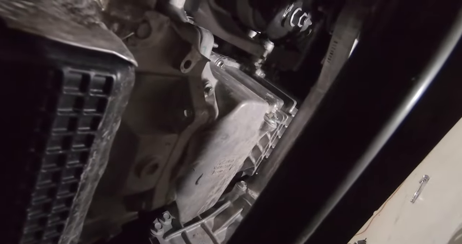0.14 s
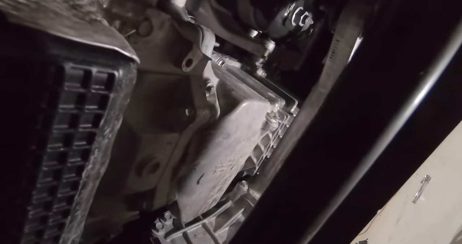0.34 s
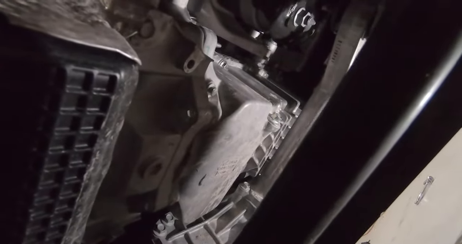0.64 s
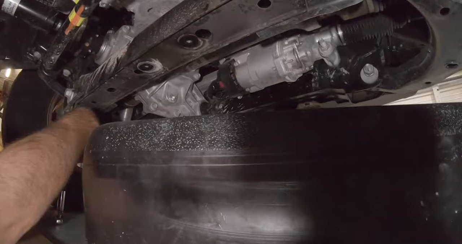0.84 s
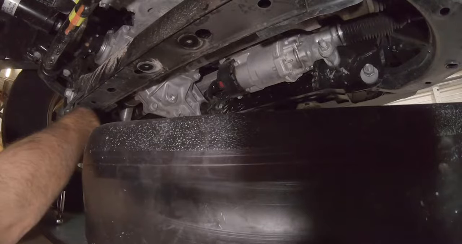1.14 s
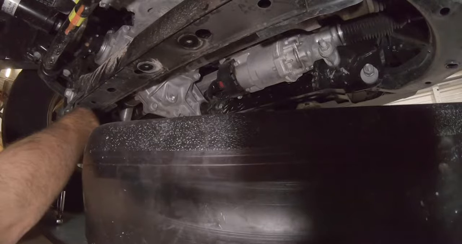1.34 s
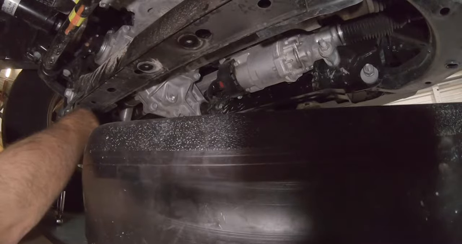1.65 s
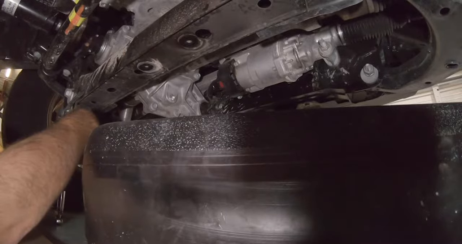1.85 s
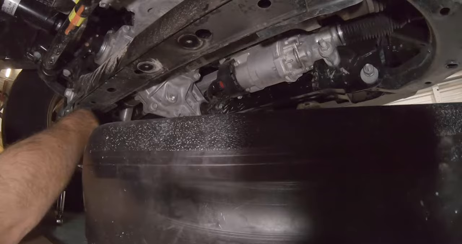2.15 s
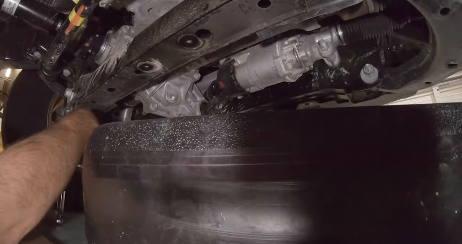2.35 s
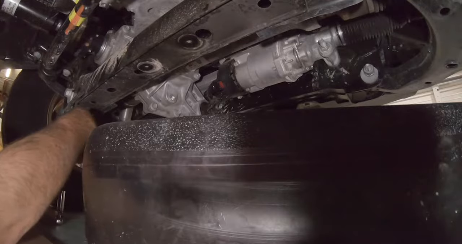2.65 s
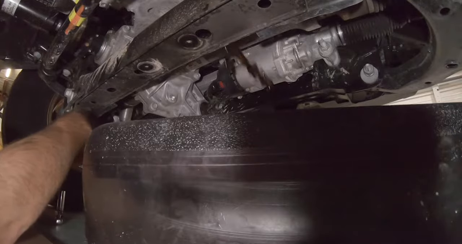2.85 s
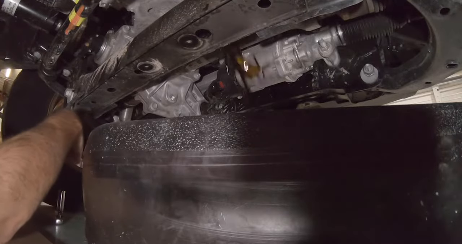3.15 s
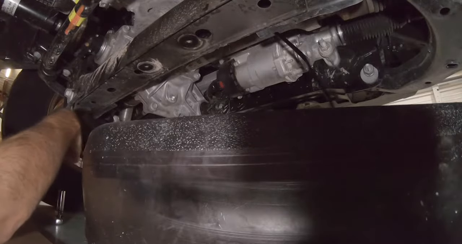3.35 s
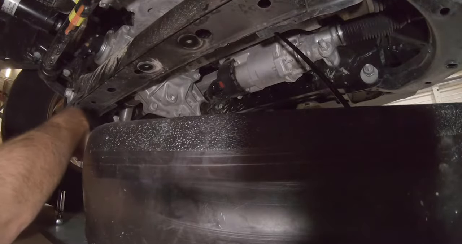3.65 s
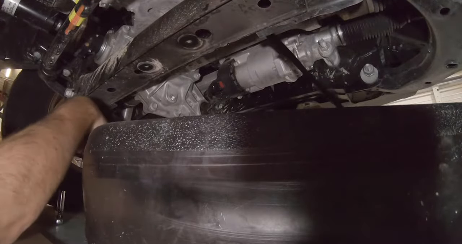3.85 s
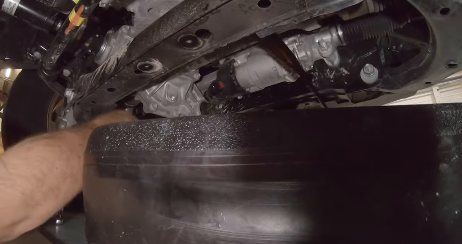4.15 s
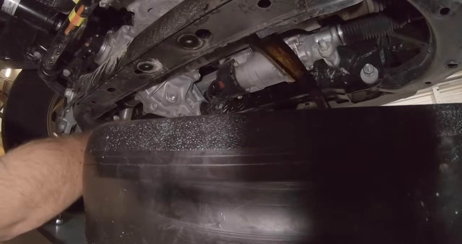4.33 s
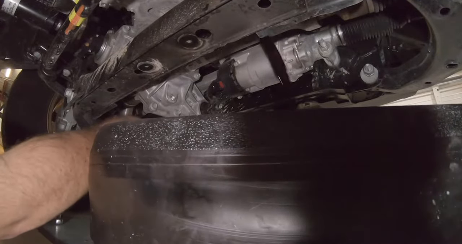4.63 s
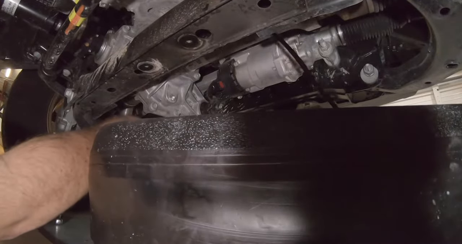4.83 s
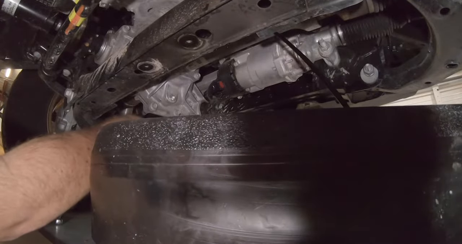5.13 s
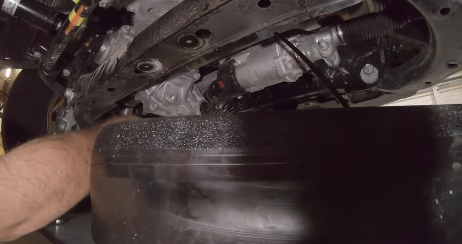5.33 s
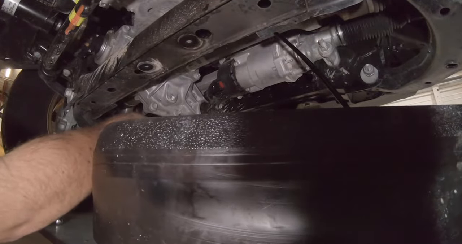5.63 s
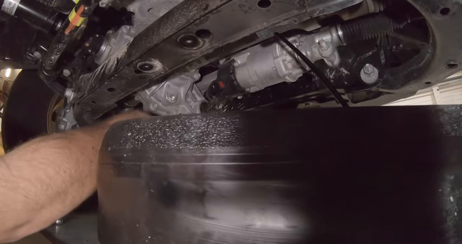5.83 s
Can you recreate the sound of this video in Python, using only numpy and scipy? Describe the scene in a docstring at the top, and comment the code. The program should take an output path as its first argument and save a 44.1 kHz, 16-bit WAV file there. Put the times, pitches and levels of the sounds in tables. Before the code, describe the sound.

Cloth rustles and bumps close by, then thick oil drips, gushes and drums into a plastic pan before the pan scrapes over gritty concrete.

```python
"""Oil change under a car

In a garage, sleeves rustle close by, then warm oil falls into a plastic pan.
A few drops lead, a gush slaps and drums on the pan's floor and settles into a soft stream.
Noise bands and puffs of noise make the oil, cloth and friction; ringing tones make the pan and the bubbles.
The pan is nudged, knocked and dragged over the concrete, with the quiet air of the garage behind it."""
import sys
import numpy as np
from scipy import signal
from scipy.fft import rfft, irfft, next_fast_len
from scipy.io import wavfile
from scipy.ndimage import uniform_filter1d

SR = 44100
rng = np.random.default_rng(int(sys.argv[2]) if len(sys.argv) > 2 else 0)


def generate_wav(sig):
    """Save sig (samples, or channels by samples) to the path in sys.argv[1] as 16-bit PCM at SR."""
    pcm = np.round(np.clip(np.atleast_2d(sig).T, -1, 1) * 32767).astype(np.int16)
    wavfile.write(sys.argv[1], SR, pcm)


N = 264004
TIME = np.arange(N) / SR

# Levels in the tables are relative: the sources and the final mix scale them further.
# surges of the gush: (start [s], hold [s], drumming level [dB], spray level [dB])
SURGES = [(2.975, 0.044, -14.5, -43.5), (3.087, 0.081, -16, -39), (3.223, 0.028, -17.5, -41),
          (3.332, 0.082, -20.5, -39.5), (3.468, 0.059, -17.5, -39.5), (4.806, 0.042, -24, -44)]
# heavy gobs of oil hit the pan's floor: (time [s], level [dB])
GOBS = [(2.967, -24), (2.979, -19), (3.084, -22.5), (3.116, -21), (3.336, -30), (3.521, -18),
        (3.552, -28.5), (4.286, -37), (4.573, -19.5)]
# notes of the pan's floor and walls: (pitch [Hz], level [dB], time to fall 60 dB [s])
PAN_MODES = [(73.3, -8, 0.82), (85.5, -3.5, 0.25), (107.3, -16, 0.37), (132.4, -8.5, 0.66),
             (164.6, -7.5, 0.47), (195.4, -0.5, 0.15), (254.6, -10.5, 0.43), (275.8, -16, 0.36),
             (358.3, -19, 0.13), (643, -7.5, 0.054)]
# flow of the settled stream: (time [s], level [dB])
FLOW = [(3.7, -39), (4.048, -41.5), (4.08, -34), (4.55, -24.5), (4.785, -22.5), (4.87, -33), (5.054, -45),
        (5.144, -27.5), (5.218, -39), (5.244, -23.5), (5.58, -52)]
# drops splat: (time [s], level [dB], centre pitch [Hz])
SPLATS = [(1.915, -49.5, 2380), (2.684, -40.5, 4170), (2.7225, -32, 4700), (2.826, -43.5, 4070),
          (2.964, -35, 1790), (2.977, -22.5, 6400), (2.979, -22, 840), (3.039, -27, 6300),
          (3.081, -38.5, 950), (3.102, -28, 750), (3.106, -23, 5540), (3.173, -34.5, 6500),
          (3.244, -40.5, 5000), (3.316, -32.5, 4530), (3.402, -17.5, 6900), (3.47, -31, 5440),
          (3.592, -41, 5500), (3.628, -51, 7500), (4.444, -42, 806), (4.523, -42, 5860), (4.699, -34, 5900)]
# drops that trap a bubble and ring: (time [s], level [dB], base pitch [Hz])
PLINKS = [(2.683, -41.5, 3000), (2.724, -32.5, 2983), (2.83, -39, 3110), (3.399, -17, 2780),
          (3.469, -28.5, 3200), (4.143, -35.5, 3200), (4.396, -39.5, 3400), (4.773, -33.5, 3400),
          (4.891, -38.5, 2700)]
# oil squirts through the drain hole: (start [s], hold [s], level [dB], centre pitch [Hz], width [octaves])
SQUIRTS = [(4.807, 0.0069, -29, 5370, 0.6), (4.838, 0.022, -30.5, 5250, 0.27),
           (4.845, 0.0071, -26, 4320, 0.88)]
# short, smooth pushes of the pan: (start [s], hold [s], level [dB])
NUDGES = [(4.555, 0.12, -30), (5.14, 0.1, -45.5), (5.945, 0.045, -30)]
# the pan is dragged hard over grit: (start [s], hold [s], level [dB], extra drive of the rim [dB])
DRAGS = [(5.636, 0.1, -31.5, -2), (5.725, 0.031, -22, 4.5), (5.764, 0.12, -35.5, -2.5),
         (5.951, .06, -22.5, -19)]
# the pan is bumped: (time [s], crack level [dB], boom level [dB])
KNOCKS = [(5.239, -19.5, -18.5)]
# the dragged pan catches on the ground and slips: (time [s], crack level [dB], boom level [dB])
SLIPS = [(5.634, -28, -41), (5.666, -21.5, -39), (5.676, -20.5, -36), (5.723, -20.5, -34),
         (5.742, -23.5, -22), (5.756, -26.5, -17), (5.811, -18.5, -30), (5.831, -15.5, -17.5),
         (5.866, -22, -18.5)]
# resonances of the stiff rim: (pitch [Hz], boost [dB])
RIM = [(836, 9), (1372, 10), (1850, 9), (2360, 4), (2710, 5), (2890, 10), (3210, 13), (3810, 6), (4308, 12),
       (5345, 6)]
# sleeves rub close by: (start [s], hold [s], level [dB])
RUBS = [(0.383, 0.023, -50), (0.495, 0.041, -46.5), (0.603, 0.028, -43), (0.668, 0.042, -57)]
# cloth scuffs the microphone's housing: (start [s], hold [s], scuff level [dB], rumble level [dB])
SCUFFS = [(0, 0.021, -38, -43), (0.079, 0.035, -38.5, -29), (0.177, 0.04, -42, -42),
          (0.231, 0.074, -40, -32), (0.378, 0.041, -43.5, -40.5), (0.467, 0.085, -45.5, -40.5),
          (0.61, 0.051, -48, -40.5)]
# soft bumps of the hand: (time [s], level [dB], pulse length [s])
BUMPS = [(0.073, -11.5, 0.005), (0.116, -28, 0.0086), (0.298, -29.5, 0.013)]
# notes of the tapped housing: (pitch [Hz], level [dB], time to fall 60 dB [s])
HOUSING_MODES = [(265.6, 5, 0.085), (534, -7, 0.072), (1144, -5, 0.024)]
# dull thuds of the arm: (start [s], hold [s], level [dB], centre pitch [Hz])
THUDS = [(1.064, 0.032, -45, 203), (1.96, 0.034, -44, 201)]
# faint hisses swell and fade: (start [s], hold [s], level [dB], centre pitch [Hz], width [octaves])
HISSES = [(1.26, 0.15, -63.5, 2220, 1.17), (2.686, 0.17, -63, 2590, 1.5), (4.849, 0.017, -49, 4960, 0.28),
          (5.33, 0.29, -68, 2170, 0.19)]
# the arm stirs against the pan: (start [s], hold [s], level [dB])
STIRRING = [(.76, 0.49, -44.5), (1.06, 0.32, -40), (2.65, 0.56, -40.5)]

# tone colours of the sources, before each is levelled: (frequency [Hz], level per Hz [dB])
GUSH_DRUM_COLOUR = [(35, -55), (65, -7), (87, -2), (112, -7.5), (185, -12.5), (220, -24), (280, -15.5),
                    (330, -32.5), (500, -38), (1000, -90.5)]
SPRAY_COLOUR = [(250, -16.5), (700, -1.5), (1200, -9.5), (2200, -12.5), (4200, -18), (6000, -11),
                (7800, -20.5), (10500, -40.5)]
STREAM_DRUM_COLOUR = [(25, -37), (50, -4), (78, -1.5), (125, 5), (150, 0), (190, 3), (280, -15.5),
                      (400, -20.5), (1000, -73)]
PATTER_COLOUR = [(250, -9.5), (700, 7), (1100, -6), (1500, -3.5), (3000, -13), (5500, -14), (8500, -64)]
SPLAT_COLOUR = [(200, -23.5), (600, 8.0), (6500, 9.5), (8200, 0.0), (10500, -22.0)]
FLAT_COLOUR = [(2000, 0)]
SLIDE_COLOUR = [(150, -10.5), (400, -2.5), (850, 9), (1150, 0.5), (1750, 0), (2200, -11.5), (5400, -11),
                (6600, -25.5), (14000, -60.5)]
GRIT_COLOUR = [(180, -20.5), (320, 4), (500, -7.5), (750, 2.5), (1100, -9), (1700, -5.5), (2300, -13.5),
               (4800, -13.5), (7000, -18.5), (9000, -51), (14000, -70.5)]
HAND_RUMBLE_COLOUR = [(12, -7.5), (50, 8.5), (130, -9), (240, -4.5), (550, -15.5), (1200, -57.5)]
CLOTH_COLOUR = [(250, 3.5), (1100, 1.5), (2300, -3.5), (4200, -4), (6000, -12.5), (8500, -38), (10400, -50)]
HOUSING_COLOUR = [(200, -10.5), (550, 5), (1500, -2.5), (2300, -10.5), (3200, -13.5), (4000, -10),
                  (5000, -16.5), (6100, -9), (7000, -21.5), (8600, -23), (10400, -50)]
GARAGE_COLOUR = [(20, -19), (55, -0.5), (110, -8), (180, -5), (300, -19.5), (520, -26.5), (780, -21.5),
                 (870, -16), (980, -29), (2000, -35), (4400, -41), (6000, -39), (8600, -51.5), (11500, -63)]

# how alike left and right are: (frequency [Hz], correlation [-1 to 1])
OIL_LIKENESS = [(110, 0.96), (270, 0.94), (480, -0.36), (900, -0.14), (1600, 0.65), (3600, 0.62),
                (6000, -0.27)]
PAN_LIKENESS = [(250, 1), (750, 0.21), (2400, 0.84), (6000, 0.085)]
HAND_LIKENESS = [(100, -0.063), (500, -0.89), (2000, -0.91), (3800, 0.87), (6000, 0.053)]
CLOTH_LIKENESS = [(1000, 1)]
AIR_LIKENESS = [(200, 0.34), (800, -0.85), (4000, -0.19)]
# the stereo image narrows for a while: (time [s], level of the left-right difference [dB])
WIDTH = [(3.7, -1.5), (4.5, -42), (5.0, -25), (5.65, -3)]

# A T60 is the time a sound takes to fall by 60 dB.
GOB_HARDNESS_HZ = 300
FLOOR_HZ, FLOOR_WAVER = 87.46, 0.04855  # average lowest note of the floor; typical share by which oil bends it
SPRAY_RELEASE_S = 0.14  # time to fall 20 dB: spray falls back more slowly than its surge
PATTER_DB, PATTER_FOLLOWS = -26, 0.86  # patter at a flow of 0 dB; share of the flow's swing in dB
SPLAT_OCTAVES, SPLAT_T60_S = 0.86, 0.037
SPIT_DB = -27.5  # the broadband part of every splat
FIZZ_DB, FIZZ_T60_S = -20.5, 0.16  # the faint tail of every splat
PLINK_RISE_S, PLINK_T60_S = 0.002, 0.028
PLINK_CLIMB_PER_S, PLINK_WAVER = 2, .08  # share of the pitch gained each second; typical share of wobble
SQUIRT_CRACKLE_DB = -25  # the broadband part of every squirt
BOOM_DB, BOOM_LAG_S, BOOM_RELEASE_S = 2, 0.014, 0.27  # the walls take up friction late, let it go slowly
BOUNCE_S, BOUNCE_DB = 0.01004, -9.5  # delay of the second blow; level of a bump's second crack
TOCK_DB, TOCK_HZ, TOCK_T60_S = 1.5, 835, 0.06  # hollow note of a bump, relative to its crack
RIM_WIDTH_HZ, RIM_WIDTH_SHARE = 32, .004  # resonance width: a fixed part plus a share of its pitch
RUSTLE_ENDS_S = 0.716
SLEEVE_LAG_S, SLEEVE_ECHO = .0008, .65  # average delay and strength of the sleeve's reflection
SLEEVE_SWING, SLEEVE_SWING_HZ = .2, 5  # typical share by which the delay swings; upper limit of its speed
TAP_S, TAP_DB = 3.521, -12.5
GARAGE_DB = -49
CUTOFF_HZ = 15700  # from here up, sound is at least 70 dB down


def from_db(db):
    """Turn decibels into a factor for loudness."""
    return 10 ** (np.asarray(db) / 20)


def rms_one(x):
    """Scale x to an average strength (rms) of 1."""
    return x / np.sqrt(np.mean(x ** 2) + 1e-20)


def gain_curve(rows, fade):
    """Turn (time, dB) rows into a gain that fades to silence outside their span."""
    seconds, db = np.transpose(rows)
    distance_inside = np.minimum(TIME - seconds[0], seconds[-1] - TIME)
    inside = np.clip(1 + distance_inside / fade, 0, 1)
    return inside * from_db(np.interp(TIME, seconds, db))


def at_hz(points, hz):
    """Read a table between its points on a log-frequency axis."""
    known, values = np.transpose(points)
    return np.interp(np.log(hz + 1), np.log(known), values)


def filtered(x, hz, kind, order=2):
    """Keep the low, high or middle band of x."""
    sections = signal.butter(order, np.clip(hz, 10, .45 * SR), kind, fs=SR, output="sos")
    return signal.sosfilt(sections, x)


def around(x, hz, octaves, order=1):
    """Keep a band of x about a centre pitch; rms 1."""
    edges = hz * 2 ** (np.array([-.5, .5]) * octaves)
    return rms_one(filtered(x, edges, "band", order=order))


def noise():
    """Two unrelated channels of white noise."""
    return rng.standard_normal((2, N))


def colour(white, spectrum, likeness):
    """Give two unrelated white signals this spectrum and stereo likeness, with no sound ahead of time; rms 1."""
    size = 2 * next_fast_len(N // 2 + 4096)
    hz = np.arange(size // 2 + 1) * SR / size
    # folding the cepstrum forward gives a filter that only looks back in time
    cepstrum = irfft(np.log(from_db(at_hz(spectrum, hz))))
    response = np.exp(rfft(2 * cepstrum[:size // 2], size) - cepstrum[0])
    alike = np.clip(at_hz(likeness, hz), -.999, .999)
    mid, side = rfft(white, size) * response * np.sqrt([1 + alike, 1 - alike])
    return rms_one(irfft([mid + side, mid - side])[:, :N])


def grains(per_s, spread_db, smear):
    """Tiny contacts of uneven size, each a puff of noise that dies at a rate set by smear [s]."""
    happens = rng.random(N) < per_s / SR
    sizes = happens * from_db(spread_db * np.minimum(rng.exponential(1, N), 3))
    power = signal.lfilter([1], [1, -np.exp(-1 / (smear * SR))], sizes ** 2 + 1e-12)
    return rms_one(np.sqrt(power) * noise())


def steady(x, seconds):
    """Even out swells slower than this many seconds."""
    power = uniform_filter1d(np.mean(x ** 2, axis=0), int(seconds * SR) + 1)
    return x / np.sqrt(np.abs(power) + 1e-9)


def strokes(rows, attack, release):
    """Rise, hold and fall for each (start, hold, dB); attack and release are the seconds taken for 20 dB."""
    power = 0
    for start, hold, db in rows:
        away = np.maximum(start - TIME, 0) / attack + np.maximum(TIME - start - hold, 0) / release
        power = power + from_db(db - 20 * np.minimum(away, 10)) ** 2
    return np.sqrt(power)


def burst(start, rise, t60):
    """An envelope that rises quickly and dies away."""
    out, first = np.zeros(N), int(start * SR)
    age = TIME[:min(N - first, SR)]
    decay = from_db(-60 * np.maximum(age - rise, 0) / t60)
    out[first:first + len(age)] = np.minimum(age / rise, 1) * decay
    return out


def click(start, db):
    """A single-sample blow."""
    return from_db(db) * (np.arange(N) == round(start * SR)) + 1e-18


def ring(force, hz, t60):
    """One note of a struck object: a unit click starts a dying sine wave."""
    r, w = from_db(-60 / (t60 * SR)), 2 * np.pi * hz / SR
    return signal.lfilter([0, np.sin(w)], [1, -2 * r * np.cos(w), r * r], force)


def pan_body(force):
    """Any force sets the pan's floor and walls ringing at their own notes."""
    return sum(from_db(db) * ring(force, hz, t60) for hz, db, t60 in PAN_MODES)


def pan_rim(x):
    """The stiff rim boosts narrow bands side by side."""
    out = 0
    for hz, db in RIM:
        r = np.exp(-np.pi * (RIM_WIDTH_HZ + RIM_WIDTH_SHARE * hz) / SR)
        poles = [1, -2 * r * np.cos(2 * np.pi * hz / SR), r * r]
        zeros = np.array([1, 0, -1]) * (1 - r * r) / 2
        out = out + from_db(db) * signal.lfilter(zeros, poles, x)
    return out


def gush():
    """Gobs and surges of oil drum on the pan and throw a fine spray; returns gobs with drumming, and spray."""
    drum = strokes([(s, hold, db) for s, hold, db, _ in SURGES], attack=0.019, release=0.12)
    spray = strokes([(s, hold, db) for s, hold, _, db in SURGES], attack=0.033, release=SPRAY_RELEASE_S)
    blows = sum(click(s, db) for s, db in GOBS)
    gobs = pan_body(filtered(blows, GOB_HARDNESS_HZ, "low", order=1))
    churn = from_db(-5.5) * steady(colour(noise(), GUSH_DRUM_COLOUR, OIL_LIKENESS), seconds=0.03)
    # the soft weight of the oil keeps the floor's lowest note ringing
    bend = rms_one(filtered(noise()[0], 13.47, "low"))
    pitch = FLOOR_HZ * (1 + FLOOR_WAVER * bend)
    ringing = rms_one(np.sin(2 * np.pi * np.cumsum(pitch) / SR))
    droplets = colour(grains(per_s=300, spread_db=4.3, smear=0.003), SPRAY_COLOUR, OIL_LIKENESS)
    return filtered(gobs, 140, "high") + drum * (churn + ringing), spray * droplets


def stream():
    """The thick stream drums, and a light patter on the pooling oil follows its flow; returns both."""
    flow = gain_curve(FLOW, fade=0.052)
    beats = colour(grains(per_s=220, spread_db=3.0, smear=0.009), STREAM_DRUM_COLOUR, PAN_LIKENESS)
    drumming = from_db(-3.0) * flow * steady(beats, seconds=0.22)
    drops = colour(grains(per_s=380, spread_db=3.5, smear=0.0037), PATTER_COLOUR, OIL_LIKENESS)
    return drumming, from_db(PATTER_DB) * flow ** PATTER_FOLLOWS * drops


def splats():
    """Each drop is a short spit of noise around a pitch, with a fizzing tail."""
    source, out = colour(noise(), SPLAT_COLOUR, OIL_LIKENESS), np.zeros((2, N))
    for s, db, hz in SPLATS:
        near = slice(int(s * SR), int(s * SR) + SR // 2)
        spit = source[:, near]
        band = around(spit, hz, SPLAT_OCTAVES)
        hit = (band + from_db(SPIT_DB) * spit) * burst(s, rise=0.0015, t60=SPLAT_T60_S)[near]
        fizz = from_db(FIZZ_DB) * band * burst(s, rise=0.016, t60=FIZZ_T60_S)[near]
        out[:, near] += from_db(db) * (hit + fizz)
    return out


def plinks():
    """A trapped bubble rings briefly in thick oil; its pitch wobbles and climbs as it nears the surface."""
    out, wobble = 0, PLINK_WAVER * rms_one(filtered(noise()[0], 900, "low"))
    for s, db, hz in PLINKS:
        climb = PLINK_CLIMB_PER_S * np.clip(TIME - s, 0, PLINK_T60_S)
        tone = np.sin(2 * np.pi * np.cumsum(hz * (1 + wobble + climb)) / SR)
        out = out + from_db(db) * burst(s, rise=PLINK_RISE_S, t60=PLINK_T60_S) * tone
    return out


def squirts():
    """Short jets of tiny droplets, each hissing in a sharply bounded band over a faint broad crackle."""
    jet = colour(grains(per_s=700, spread_db=4, smear=.001), FLAT_COLOUR, OIL_LIKENESS)
    out = 0
    for s, hold, db, hz, octaves in SQUIRTS:
        hiss = around(jet, hz, octaves, order=4) + from_db(SQUIRT_CRACKLE_DB) * jet
        out = out + strokes([(s, hold, db)], attack=0.003, release=0.014) * hiss
    return out


def drag():
    """Plastic is bumped, sticks and slips on grit: rim rings, walls boom; returns boom and rasp."""
    friction = strokes([(s, hold, db) for s, hold, db, _ in DRAGS], attack=0.036, release=0.02)
    on_rim = strokes([(s, hold, db + rim_db) for s, hold, db, rim_db in DRAGS], attack=0.012, release=0.01)
    late = [(s + BOOM_LAG_S, hold, db + BOOM_DB) for s, hold, db, _ in DRAGS]
    boom = strokes(late, attack=0.05, release=BOOM_RELEASE_S)

    cracks = sum(from_db(db) * burst(s, rise=0.00038, t60=0.03) for s, db, _ in KNOCKS + SLIPS)
    for s, db, _ in KNOCKS:  # a second, weaker crack as the pan settles
        cracks += from_db(db + BOUNCE_DB) * burst(s + BOUNCE_S, rise=0.00073, t60=0.03)
    grit = grains(per_s=1400, spread_db=-1.5, smear=0.0018)
    snaps = cracks * noise()
    contact = friction * grit + snaps
    strength = np.sqrt(np.mean(contact ** 2))
    scrape = contact + pan_rim(on_rim * grit + snaps)
    rasp = from_db(-2.0) * strength * colour(scrape, GRIT_COLOUR, PAN_LIKENESS)
    # a slip rings the hollow note half as strongly as a knock
    tocks = sum(click(s, db) for s, db, _ in KNOCKS) + .5 * sum(click(s, db) for s, db, _ in SLIPS)
    rasp += from_db(TOCK_DB) * ring(tocks, TOCK_HZ, TOCK_T60_S)

    shoves = sum(click(s, db) + click(s + BOUNCE_S, db) for s, _, db in KNOCKS + SLIPS)
    blows = pan_body(filtered(shoves, [150, 700], "band", order=1))
    shaking = filtered(filtered(noise()[0], 460, "low"), 210, "high", order=1)
    judder = steady(pan_body(shaking)[None], seconds=0.067)
    return blows + boom * judder, rasp * from_db([[-1.8], [1.4]])  # the rasp leans right


def nudges():
    """Short, smooth pushes of the pan over concrete: many tiny contacts blur into a slide."""
    push = strokes(NUDGES, attack=0.039, release=0.05)
    slide = colour(grains(per_s=1500, spread_db=3, smear=0.012), SLIDE_COLOUR, PAN_LIKENESS)
    return from_db(1.5) * push * slide


def sweeping(x):
    """A close reflection off the moving sleeve: its changing delay sweeps peaks through the rustle."""
    swing = rms_one(filtered(noise()[0], SLEEVE_SWING_HZ, "low"))
    lag = SLEEVE_LAG_S * (1 + SLEEVE_SWING * swing)
    echo = np.array([np.interp(TIME - lag, TIME, side) for side in x])
    return rms_one(x + SLEEVE_ECHO * echo)


def handling():
    """Cloth brushes close by, scuffs the housing and snags once while the hand rumbles and bumps."""
    rustle = strokes(RUBS, attack=0.075, release=0.059)
    scuff = strokes([(s, hold, db) for s, hold, db, _ in SCUFFS], attack=0.063, release=0.039)
    grip = strokes([(s, hold, db) for s, hold, _, db in SCUFFS], attack=0.043, release=0.05)
    brushing = colour(grains(per_s=1700, spread_db=5, smear=0.014), CLOTH_COLOUR, CLOTH_LIKENESS)
    scraping = colour(grains(per_s=1200, spread_db=3.5, smear=0.0029), HOUSING_COLOUR, HAND_LIKENESS)
    out = grip * colour(noise(), HAND_RUMBLE_COLOUR, HAND_LIKENESS)
    out += rustle * sweeping(brushing)
    out += scuff * scraping
    snag = from_db(-42.5) * around(noise()[0], hz=1750, octaves=0.59, order=2)
    snag = snag + from_db(-37.0) * around(noise(), hz=6400, octaves=0.4, order=2)
    out += snag * burst(0.057, rise=0.0059, t60=0.2)
    for k, (s, db, length) in enumerate(BUMPS):  # shoves alternate and reach the two sides in opposite phase
        push = np.sin(np.pi * np.clip((TIME - s) / length, 0, 1)) ** 2
        out += (-1) ** k * from_db(db) * push * np.array([[.6], [-1.6]])
    return out * np.clip((RUSTLE_ENDS_S - TIME) / 0.0054, 0, 1)


def tap():
    """One tap on the microphone's housing rocks it sideways, so the two sides ring in opposite phase."""
    blow = click(TAP_S, TAP_DB)
    rocking = sum(from_db(db) * ring(blow, hz, t60) for hz, db, t60 in HOUSING_MODES)
    return rocking * np.array([[.85], [-1.1]])


def thuds():
    """The soft weight of the arm lands as a low band of noise, without any crack."""
    out = 0
    for s, hold, db, hz in THUDS:
        dull = steady(around(noise()[0], hz, octaves=0.66, order=2)[None], seconds=0.031)
        out = out + strokes([(s, hold, db)], attack=0.005, release=0.062) * dull
    return out


def garage():
    """Still air as steady coloured noise, a few faint hisses and the arm stirring against the pan."""
    air = from_db(GARAGE_DB) * colour(noise(), GARAGE_COLOUR, AIR_LIKENESS)
    for start, hold, db, hz, octaves in HISSES:
        swell = strokes([(start, hold, db)], attack=0.17, release=.2)
        air += swell * around(noise()[0], hz, octaves, order=2)
    stir = strokes(STIRRING, attack=0.016, release=0.096)
    rubbing = steady(colour(noise(), STREAM_DRUM_COLOUR, AIR_LIKENESS), seconds=0.037)
    return air + from_db(-6.0) * stir * rubbing


def underbody(x, t60, dull_hz):
    """Dense reflections between the concrete and the car's underside, as a dying tail of dulled noise."""
    age = TIME[:SR // 2]
    tail = filtered(rng.standard_normal((2, len(age))), dull_hz, "low")
    tail = tail * from_db(-60 * age / t60) * (age > .002)
    return signal.fftconvolve(x, tail / np.sqrt(np.sum(tail ** 2) / 2), axes=1)[:, :N]


def scene():
    """Mix all sources; the bright ones also echo in a short and a long tail under the car."""
    gobs, spray = gush()
    drumming, patter = stream()
    boom, rasp = drag()
    bright = splats() + plinks() + squirts() + spray + patter + nudges() + rasp
    near = from_db(-13.5) * underbody(bright, t60=0.04, dull_hz=8050)
    far = from_db(-20.5) * underbody(bright, t60=0.51, dull_hz=6500)
    oil_and_pan = gobs + drumming + boom + from_db(-2.5) * bright + near + far
    return oil_and_pan + handling() + tap() + thuds() + garage()


def record(dry):
    """The stereo image narrows and opens again; the highest treble is cut."""
    mid = dry.mean(axis=0)
    side_gain = from_db(np.interp(TIME, *np.transpose(WIDTH)))
    sound = mid + (dry - mid) * side_gain
    return signal.sosfilt(signal.cheby2(12, 70, CUTOFF_HZ, fs=SR, output="sos"), sound)


dry = scene()
out = record(dry)
generate_wav(out)
```